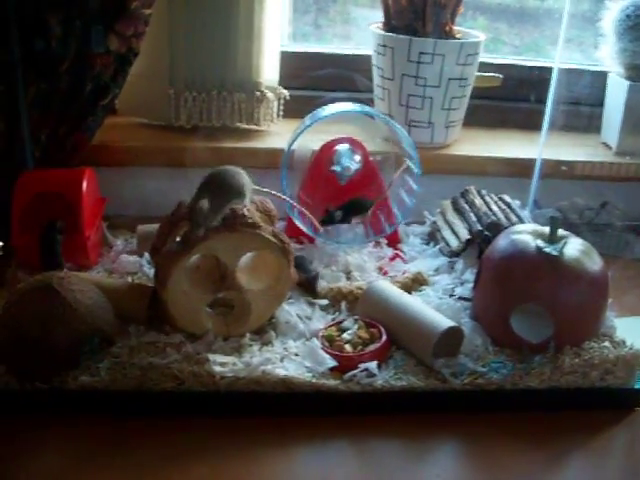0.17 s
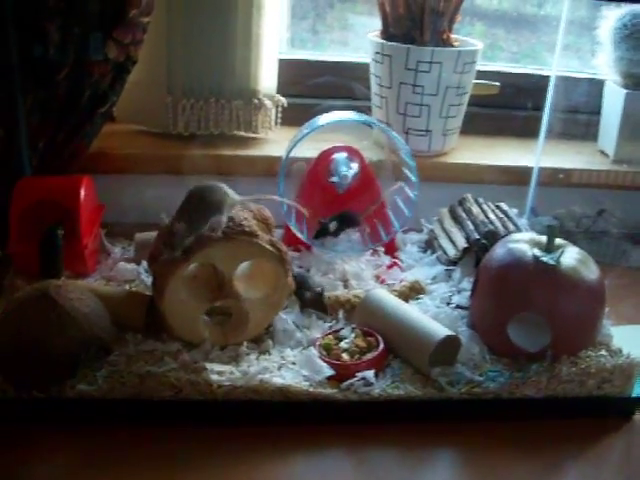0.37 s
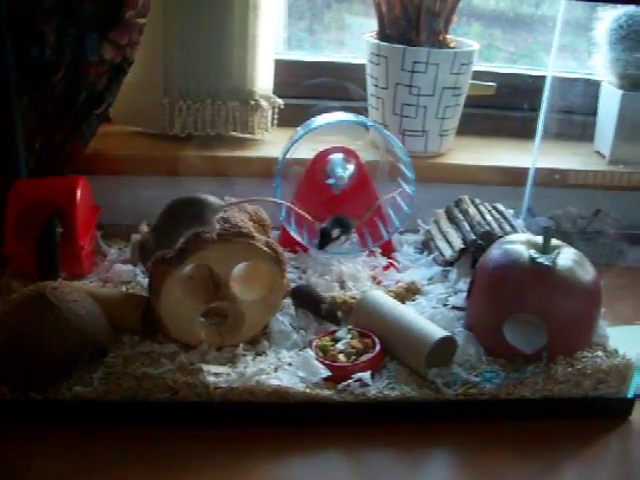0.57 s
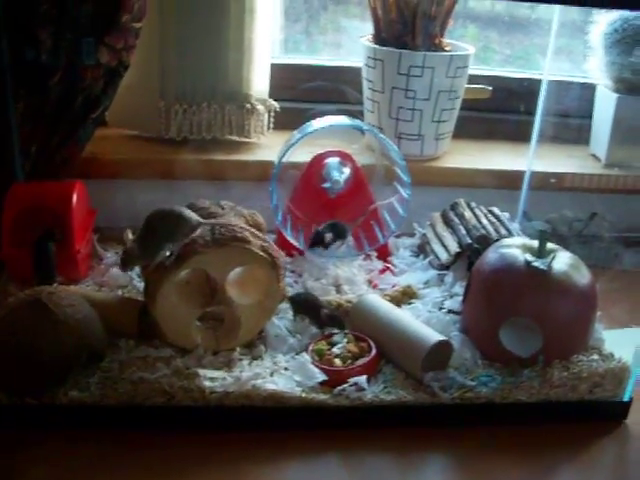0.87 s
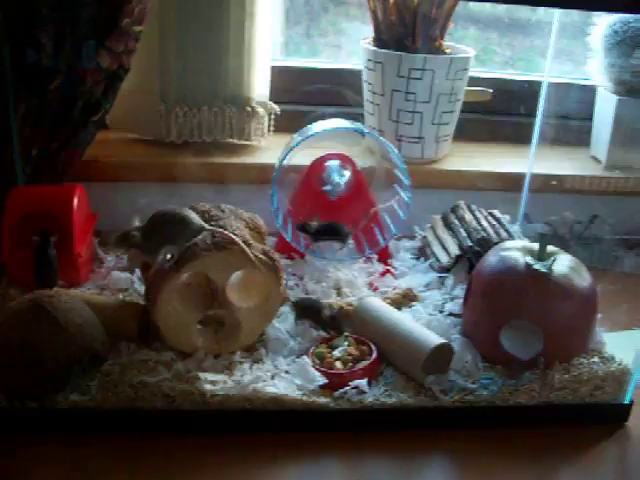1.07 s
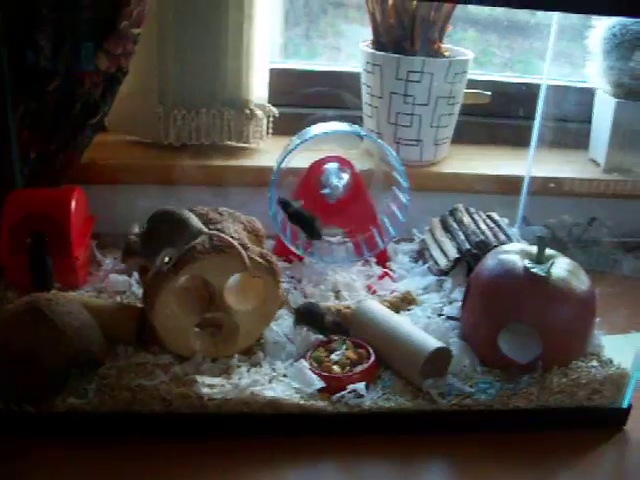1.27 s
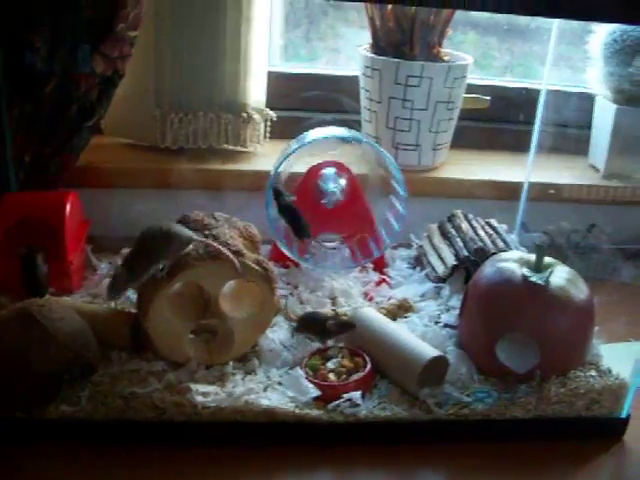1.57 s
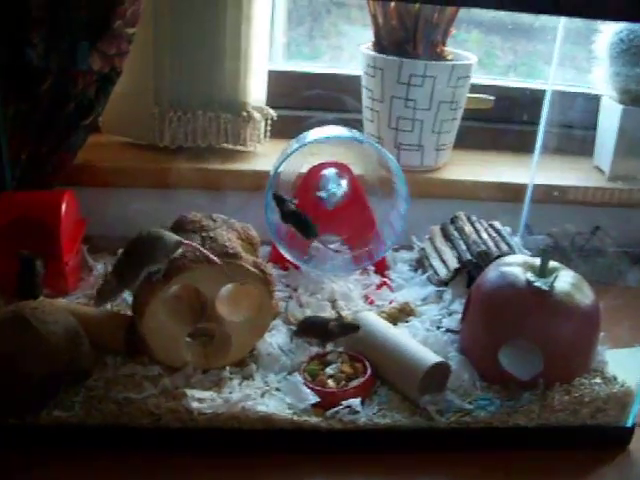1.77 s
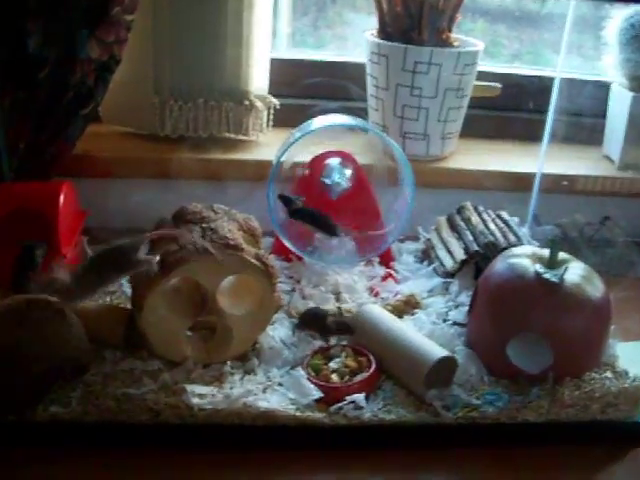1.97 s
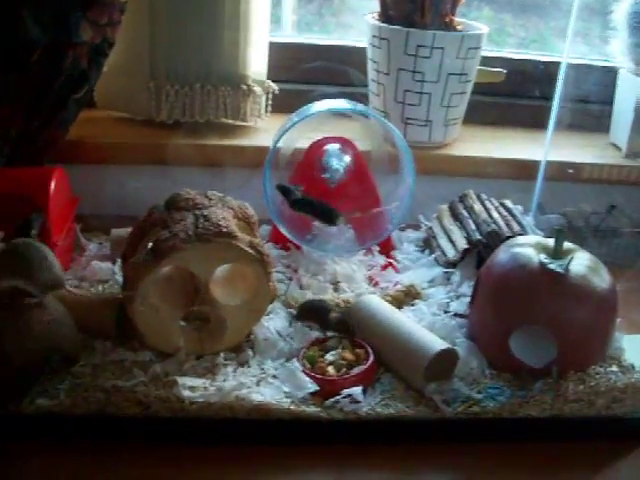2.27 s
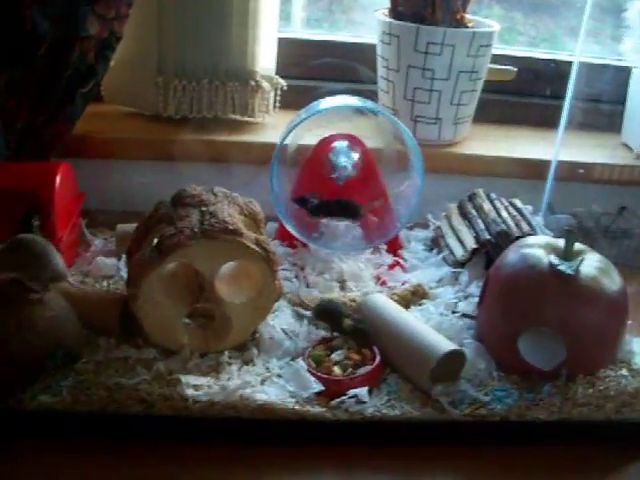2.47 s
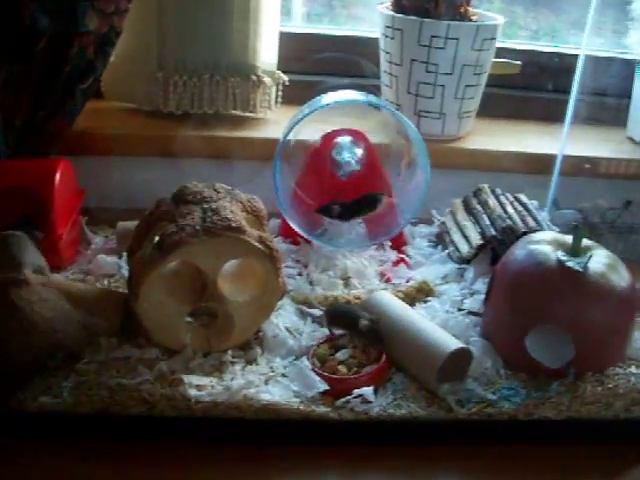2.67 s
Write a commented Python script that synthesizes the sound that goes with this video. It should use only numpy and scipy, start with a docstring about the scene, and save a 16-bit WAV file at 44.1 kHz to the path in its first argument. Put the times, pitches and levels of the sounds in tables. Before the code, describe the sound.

A small plastic exercise wheel knocks hollowly and irregularly on its stand as a mouse runs, with claw scratches, ticks and bedding rustle; after under two seconds it settles into dull bumps and low hum, indoors.

```python
"""Mouse running in a plastic wheel

A wheel in a glass tank knocks hollowly on its stand about a dozen times a second (decaying tones
and noise), then only bumps dully. Claws and bedding scratch and tick (shaped clicks, mode pairs);
paws patter, bedding rustles and the wheel rumbles (coloured clicks and noise).
Diffuse tails follow most sounds, over a low hum, faint steady tones and hiss (sines, noise)."""
import sys
import numpy as np
from scipy import signal
from scipy.fft import rfft, irfft
from scipy.io import wavfile
from scipy.ndimage import uniform_filter1d

SR = 44100
rng = np.random.default_rng(int(sys.argv[2]) if len(sys.argv) > 2 else 0)


def pcm_store(signal):
    """Save signal as 16-bit PCM."""
    levels = np.round(np.clip(np.atleast_2d(signal), -1, 1) * 32767)
    wavfile.write(sys.argv[1], SR, levels.astype(np.int16).T)


N = 123921
TOP_HZ = 8150
GRAINS_PER_S = 9000  # dense crackle of scratches and clatter
CLAW_ATTACK_S = 0.002


def undb(db):
    """Amplitude gain from dB."""
    return 10 ** (np.asarray(db) / 20)


def unit(x):
    """Scale to rms 1."""
    return x / np.sqrt(np.mean(x ** 2) + 1e-20)


def curve(points):
    """Gain over time, linear in dB between (t/s, level/dB) points."""
    t_s, db = np.array(points).T
    return undb(np.interp(np.arange(N) / SR, t_s, db))


def bin_hz():
    """FFT bin frequencies, floored at 1 Hz for logarithms."""
    return np.maximum(np.fft.rfftfreq(N, 1 / SR), 1)


def colour(x, points):
    """Shape the spectrum by (f/Hz, level/dB) points on a log-frequency axis; rms 1."""
    hz, db = np.array(points, float).T
    gain = undb(np.interp(np.log(bin_hz()), np.log(hz), db))
    return unit(irfft(rfft(x) * gain, N))


def walk(rate_hz):
    """Slow random wandering, rms 1: stepped noise smoothed twice."""
    step = int(SR / rate_hz)
    held = rng.standard_normal(N)[np.arange(N) // step]
    return unit(uniform_filter1d(uniform_filter1d(held, step), step))


def grains(per_s, spread_db=0):
    """Sparse one-sample clicks of random time, sign and size."""
    hits = rng.random(N) < per_s / SR
    return hits * rng.choice([-1, 1], N) * undb(spread_db * rng.standard_normal(N))


def since(start_s):
    """Seconds since a start, zero before it."""
    return np.maximum(np.arange(N) / SR - start_s, 0)


def room(x, wet_db):
    """Add the diffuse tail from tank and walls: delayed noise that builds, then decays."""
    delay_s, build_s, t60_s = 0.028, 0.008, 0.42
    t = since(delay_s)[:SR]
    envelope = (1 - np.exp(-t / build_s)) * np.exp(-np.log(1000) * t / t60_s)
    tail = rng.standard_normal(len(t)) * envelope
    tail /= np.sqrt(np.sum(tail ** 2))
    return x + undb(wet_db) * signal.fftconvolve(x, tail)[:N]


def running():
    """Turning wheel rumbles (coloured noise); paws patter and bedding rustles (coloured clicks)."""
    # rumble colour: f/Hz, level/dB
    rumble_colour = [(30, -19), (44, 4.5), (75, -13.5), (101, 8), (130, -4.5), (167, 1.5), (205, -7.5),
                     (300, -37.5)]
    # rumble level: t/s, level/dB
    rumble_level = [(.1, -48), (.2, -44.5), (.35, -46), (.55, -41.5), (.78, -45), (.97, -39), (1.3, -50.5),
                    (1.5, -45.5), (2.1, -50), (2.81, -44)]
    # paw patter colour: f/Hz, level/dB
    paw_colour = [(100, -31.5), (180, -21), (230, 5.5), (310, 8.5), (380, -1), (520, -3), (1000, -43)]
    # paw patter level: t/s, level/dB
    paw_level = [(0, -49), (.9, -46), (2.81, -51.5)]
    # bedding rustle colour: f/Hz, level/dB
    rustle_colour = [(300, 10.5), (550, 4.5), (900, 1.5), (1500, -12.5), (3000, -12.5), (6000, -34),
                     (9000, -44.5)]
    # how busy the mouse is: t/s, rustle gain/dB
    activity = [(0, 13), (.17, -9.5), (.25, 0), (.7, 5), (1.8, 4.5), (2.0, 0), (2.81, -5)]
    paws_per_s, paws_room_db = 110, 0.5
    rustle_per_s, rustle_room_db, rustle_db = 1500, 5, -50.5

    rumble = colour(rng.standard_normal(N), rumble_colour) * curve(rumble_level)
    patter = colour(grains(paws_per_s), paw_colour)
    paws = unit(room(patter, paws_room_db)) * curve(paw_level)
    crackle = colour(grains(rustle_per_s, spread_db=2.0), rustle_colour)
    rustle = undb(rustle_db) * unit(room(crackle, rustle_room_db)) * curve(activity)
    return rumble + paws + rustle


def background():
    """Low hum and faint tones, sines wavering in level and phase, over coloured-noise hiss."""
    # hum level: t/s, rms level/dB
    hum_level = [(.07, -40), (.13, -50), (.22, -44.5), (.42, -50.5), (1.1, -50.5), (1.5, -44), (1.9, -44),
                 (2.3, -42), (2.7, -38.5)]
    # faint steady tones: f/Hz, rms level/dB
    tone_table = [(101.5, -58), (171, -59.5), (4290, -68.5)]
    # hiss colour: f/Hz, level/dB
    air_colour = [(20, -0.5), (45, 9), (80, -7.5), (150, -23.5), (300, -8.5), (550, -15), (1000, -13.5),
                  (2000, -20), (7000, -24.5), (8500, -31)]
    hum_hz, hum_waver_db, air_db = 65.2, 0.8, -49

    t = since(0)
    hum_gain = curve(hum_level) * undb(hum_waver_db * walk(8.5))
    hum = hum_gain * np.sin(2 * np.pi * hum_hz * t + 0.13 * walk(8.3))
    tones = np.zeros(N)
    for hz, db in tone_table:
        tones += undb(db + 0.5 * walk(4.5)) * np.sin(2 * np.pi * hz * t + 0.19 * walk(3.4))
    hiss = undb(air_db) * colour(rng.standard_normal(N), air_colour)
    return np.sqrt(2) * (hum + tones) + hiss  # sine peak from rms


def scratches():
    """Claws and shavings: short showers of dense clicks, each with its own resonances."""
    # scratches: t/s, level/dB, decay/s, centre f/Hz
    scratch_table = [(0.082, -52, 0.037, 3090), (.236, -48, 0.011, 4230), (.412, -53, 0.029, 5020),
                     (0.494, -48, 0.013, 4460), (0.613, -46, 0.023, 4430), (.678, -44, 0.014, 3900),
                     (0.818, -39.5, 0.011, 4000), (.842, -45, 0.012, 4340), (0.981, -48, 0.011, 4650),
                     (1.01, -46, 0.025, 4460), (1.042, -43, 0.012, 4800), (1.192, -40.5, 0.014, 4670),
                     (1.212, -43, 0.019, 5040), (1.255, -43.5, 0.0061, 3700), (1.350, -43, 0.019, 4200),
                     (1.449, -43.5, 0.02, 4800), (1.539, -44.5, 0.0045, 3220), (1.703, -46, 0.014, 3800),
                     (1.834, -49, 0.039, 3600)]
    width_octaves, patchy_db, room_db = 0.9, 3, -7
    damp_hz = 6900  # bedding soaks up the top

    out = np.zeros(N)
    f = bin_hz()
    crackle = rfft(grains(GRAINS_PER_S))
    damping = 1 / np.hypot(1, (f / damp_hz) ** 2)
    for start_s, db, decay_s, hz in scratch_table:
        t = since(start_s)
        # random spectral bumps, spread near 1
        peaks = np.interp(f, np.linspace(0, TOP_HZ, 36), rng.uniform(-1, 1, size=36)) * np.sqrt(3)
        band = 1 / (1 + (np.log2(f / hz) / width_octaves) ** 2)
        noise = unit(irfft(crackle * undb(patchy_db * peaks) * band * damping, N))
        out += undb(db) * noise * (1 - np.exp(-t / CLAW_ATTACK_S)) * np.exp(-t / decay_s)
    return room(out, room_db)


def wheel_knocks():
    """Knocks make the wheel judder, flex and clatter; wheel, stand and tank modes ring on; bumps rattle."""
    # knocks of the wheel: t/s, level/dB, length/s, pitch f/Hz, clatter/dB
    knock_table = [(0.2453, -27, 0.024, 337, -2.5), (0.302, -28.5, 0.0045, 360, -16.5),
                   (0.347, -30, 0.019, 337, -16), (0.448, -25, .012, 349, -0.5),
                   (0.467, -23.5, 0.011, 349, -13.5), (0.569, -28, .01, 346, -4),
                   (0.651, -29.5, 0.013, 351, -3), (0.662, -28.5, 0.015, 339, -10),
                   (0.79, -30.5, .015, 329, -6.5), (0.867, -25.5, 0.021, 338.5, -.5),
                   (0.975, -26.5, 0.02, 345.6, 0), (1.094, -27, 0.023, 341, -6),
                   (1.179, -25, .013, 342, -2), (1.1943, -25, 0.012, 348, -3.5),
                   (1.256, -25.5, 0.026, 338, -4), (1.382, -20.5, 0.023, 345.5, 7.5),
                   (1.512, -30, 0.012, 338, -5), (1.708, -24, .012, 358, 4.5),
                   (1.7257, -23, 0.0106, 342, -14)]
    # bumps as the wheel rocks and the mouse shifts: t/s, level/dB, pitch f/Hz
    bump_table = [(1.423, -28, 348), (1.479, -32, 230), (1.753, -28, 324), (1.826, -34, 218),
                  (2.258, -34.5, 311)]
    # modes of wheel, stand and tank: f/Hz, level/dB
    mode_table = [(170, -14), (252, -19), (347, -6), (401, -5.5), (552, -15), (836, -17), (895, -19),
                  (1033, -22), (1218, -24.5), (1432, -27), (1624, -25), (2108, -28)]
    # clatter colour of loose plastic: f/Hz, level/dB
    clatter_colour = [(150, -29), (280, 4.5), (450, 6), (620, -5.5), (950, 1), (1500, -6.5), (2400, -9),
                      (3100, -13.5), (8000, -28.5)]
    attack_s, release_s, knock_room_db = 0.009, 0.005, -10
    clatter_rise_s, clatter_db, clatter_room_db = 0.012, -45, -3.5
    bend_hz, bend_fall_s, bend_db = 2000, 0.03, -33.5  # flexing wall: high notes arrive first
    bump_rise_s, bump_rattle_db = 0.0021, 25.5
    ring_rise_s, modes_t60_s, modes_db = 0.0067, 0.31, -31

    judder, flex, contact, blows = np.zeros((4, N))
    for start_s, db, length_s, hz, hit_db in knock_table:
        t = since(start_s)
        end_s = start_s + length_s
        attack = np.sin(np.pi / 2 * np.minimum(t / attack_s, 1))
        release = np.exp(-since(end_s) / release_s)
        judder += undb(db) * attack * release * np.sin(2 * np.pi * hz * t)
        push = undb(hit_db) * t / clatter_rise_s * np.exp(1 - t / clatter_rise_s)
        contact += push
        sweep = np.exp(-t / bend_fall_s)
        # falling pitch: bend_hz * sweep
        glide = np.sin(2 * np.pi * (bend_hz * bend_fall_s * sweep + rng.random()))
        flex += push * sweep * (1 - sweep) * glide
        blows[int(end_s * SR)] += undb(hit_db)
    for start_s, db, hz in bump_table:
        t = since(start_s)
        push = undb(db) * (t / bump_rise_s * np.exp(1 - t / bump_rise_s)) ** 2
        judder += push * np.sin(2 * np.pi * hz * t)
        contact += undb(bump_rattle_db) * push

    t = since(0)[:SR]
    ring = sum(undb(db) * np.sin(2 * np.pi * (hz * t + rng.random())) for hz, db in mode_table)
    ring *= np.exp(-np.log(1000) * t / modes_t60_s) * (1 - np.exp(-t / ring_rise_s))
    body = undb(modes_db) * signal.fftconvolve(blows, ring)[:N]
    clatter = undb(clatter_db) * contact * colour(grains(GRAINS_PER_S), clatter_colour)
    plastic = room(clatter + undb(bend_db) * flex, clatter_room_db)
    return room(judder, knock_room_db) + body + plastic


def claw_ticks():
    """A claw catches the hard plastic, which rings briefly in two close modes."""
    # ticks: t/s, level/dB, pitch f/Hz
    tick_table = [(.494, -45.5, 3800), (0.82, -46, 5200), (.846, -45.5, 5230), (.881, -47, 4090),
                  (1.04, -41.5, 3967), (1.066, -43.5, 2230), (1.281, -43, 2680), (1.35, -47.5, 6830),
                  (1.706, -46, 2470)]
    decay_s, split, room_db = 0.01, 0.025, -12  # split: relative mode spacing, standard deviation

    out = np.zeros(N)
    for start_s, db, hz in tick_table:
        t = since(start_s)
        second_hz = hz * (1 + split * rng.standard_normal())
        pair = np.sin(2 * np.pi * hz * t) + 0.5 * np.sin(2 * np.pi * second_hz * t)
        out += undb(db) * pair * (1 - np.exp(-t / CLAW_ATTACK_S)) * np.exp(-t / decay_s)
    return room(out, room_db)


def scene():
    """Sum of all sources, one channel."""
    return (running() + background() + scratches() + wheel_knocks() + claw_ticks())[None]


def record(dry):
    """The recorder cuts steeply above TOP_HZ (linear-phase low-pass)."""
    lowpass = signal.firwin(101, TOP_HZ, window=("kaiser", 8), fs=SR)
    return signal.fftconvolve(dry, lowpass[None], mode="same")


dry = scene()
out = record(dry)
pcm_store(out)
```